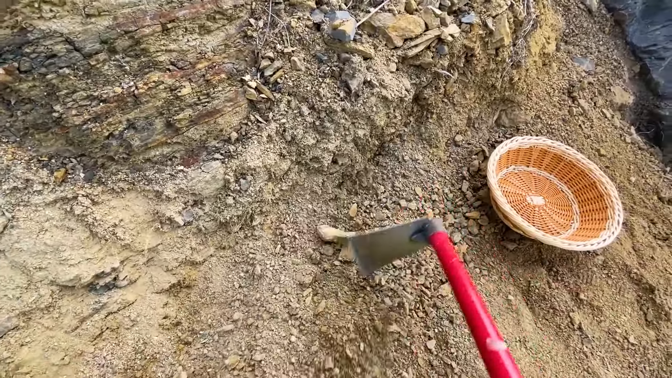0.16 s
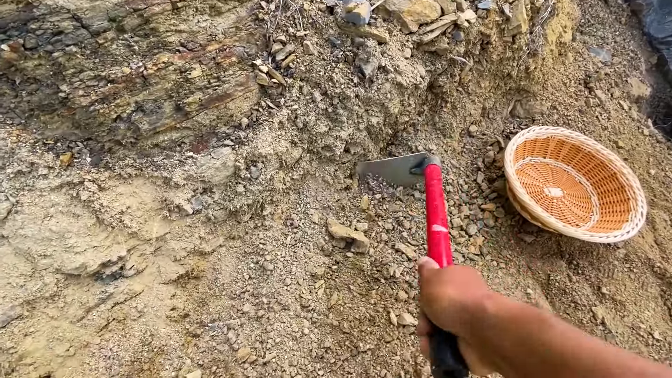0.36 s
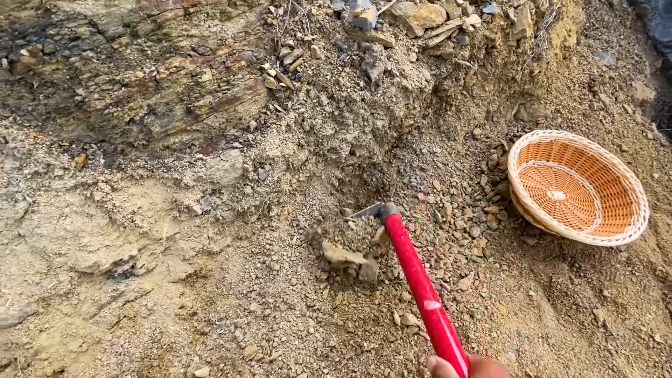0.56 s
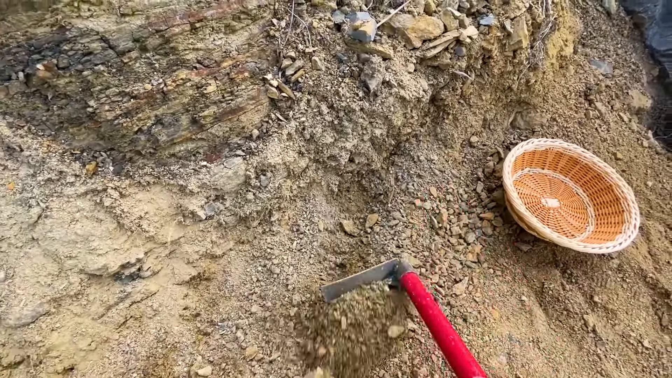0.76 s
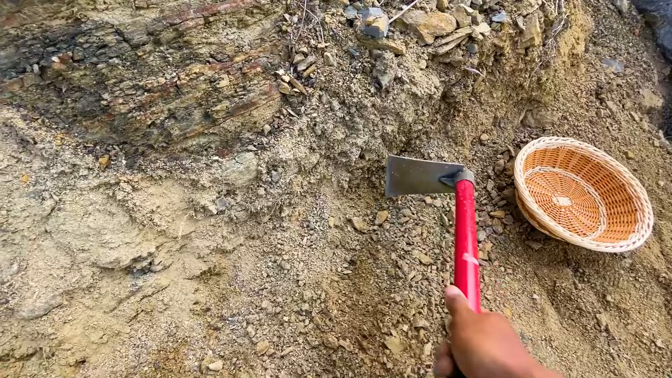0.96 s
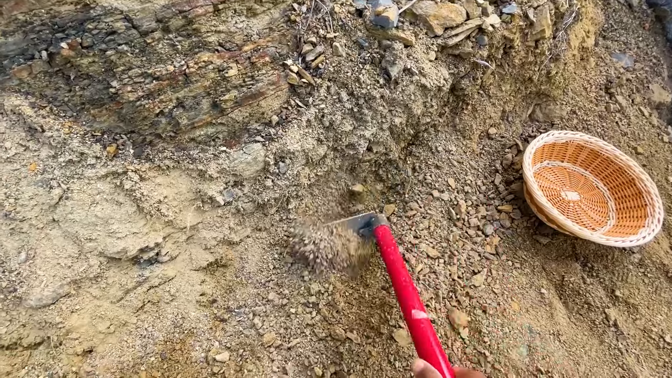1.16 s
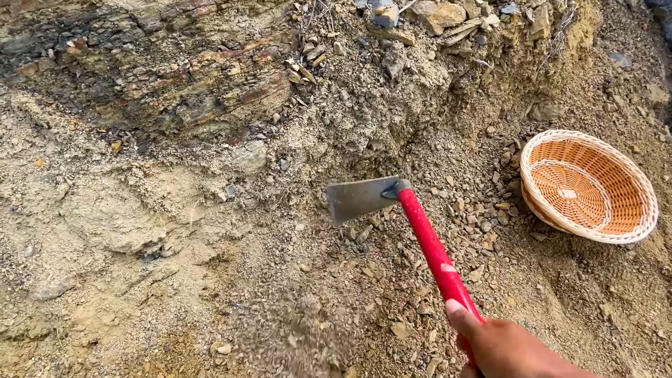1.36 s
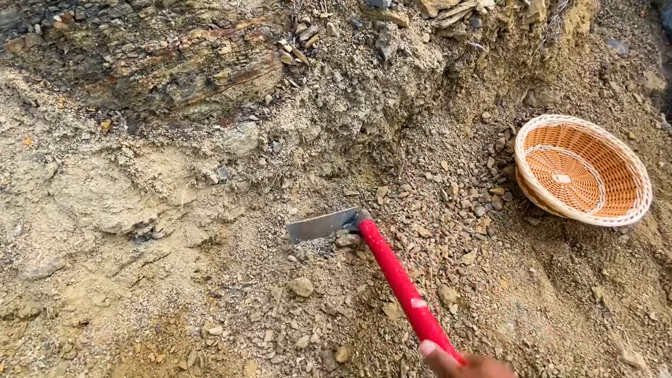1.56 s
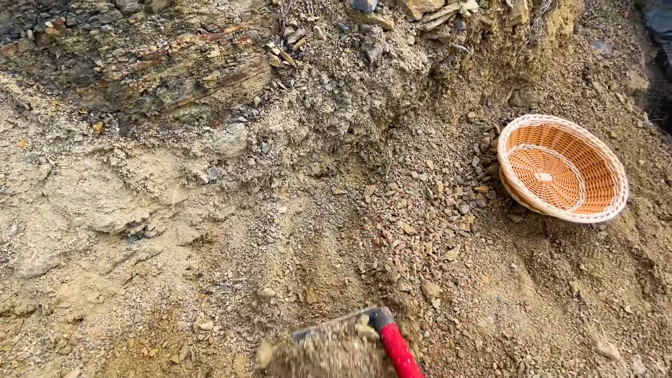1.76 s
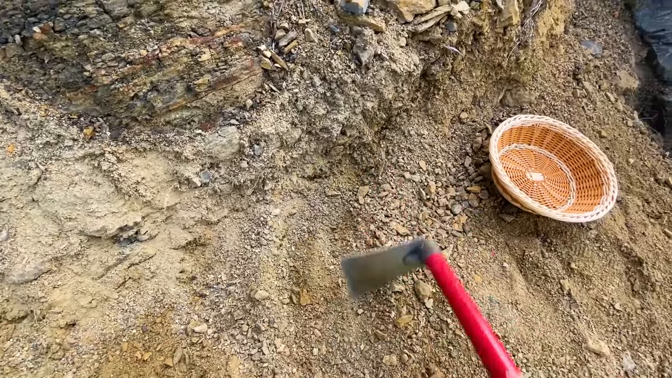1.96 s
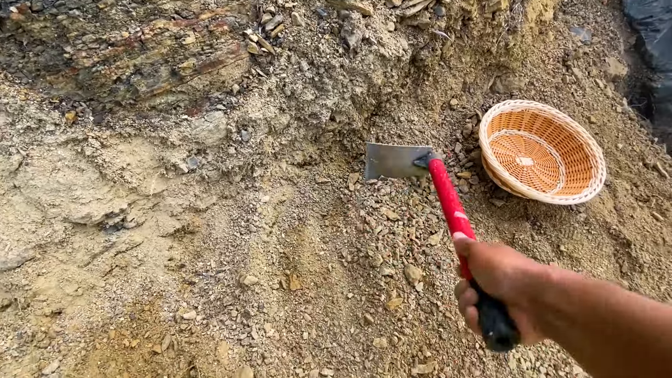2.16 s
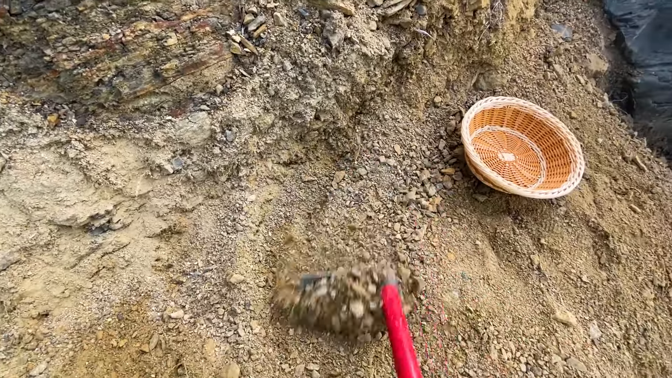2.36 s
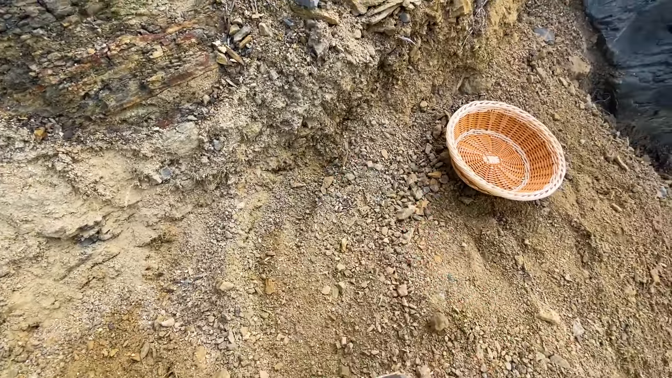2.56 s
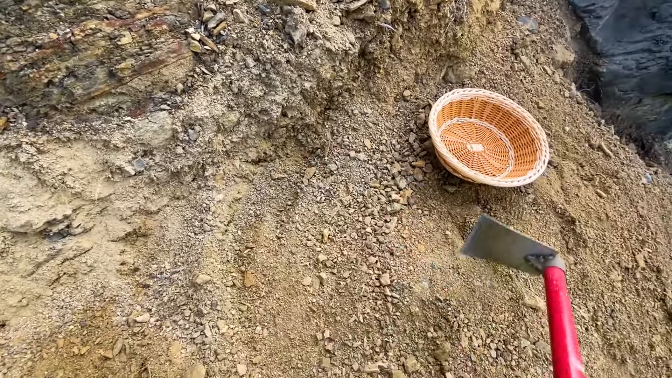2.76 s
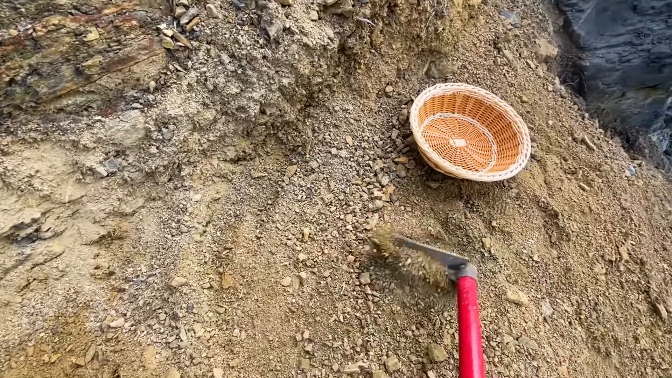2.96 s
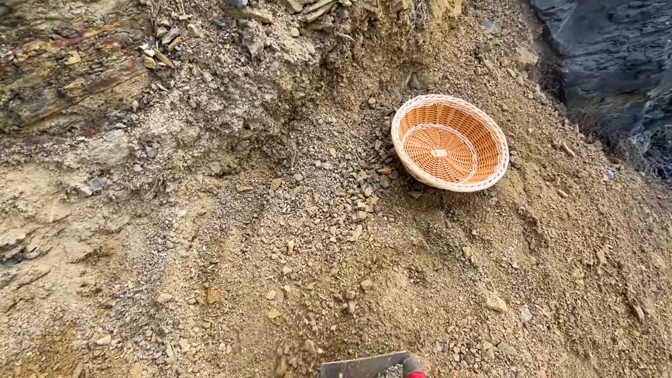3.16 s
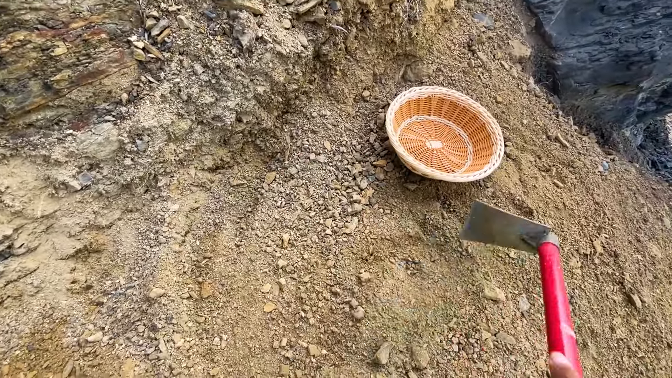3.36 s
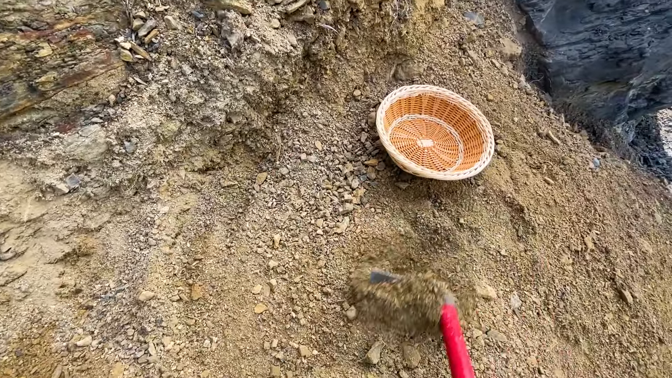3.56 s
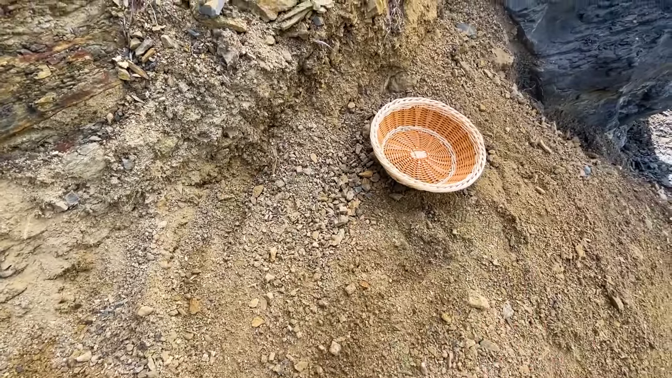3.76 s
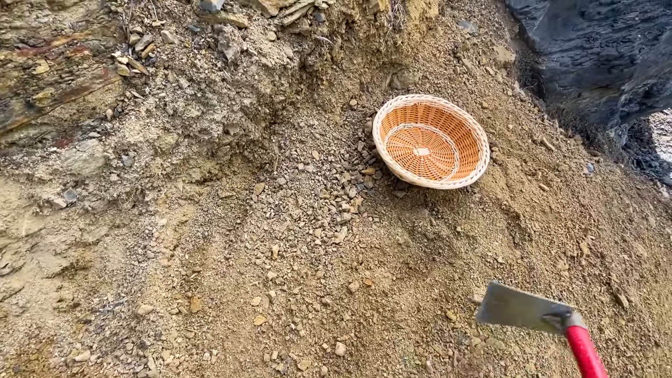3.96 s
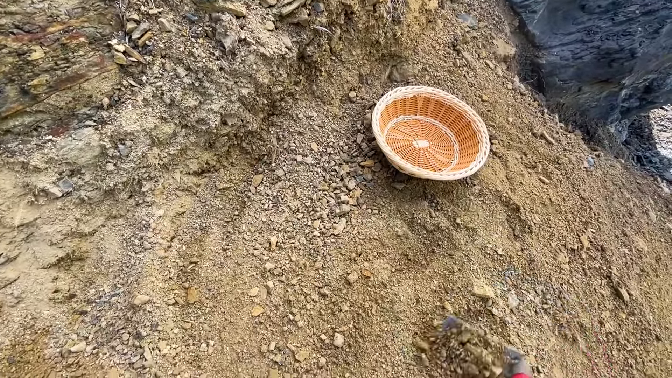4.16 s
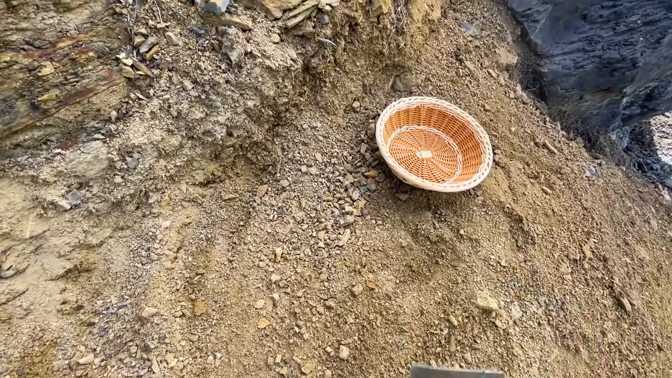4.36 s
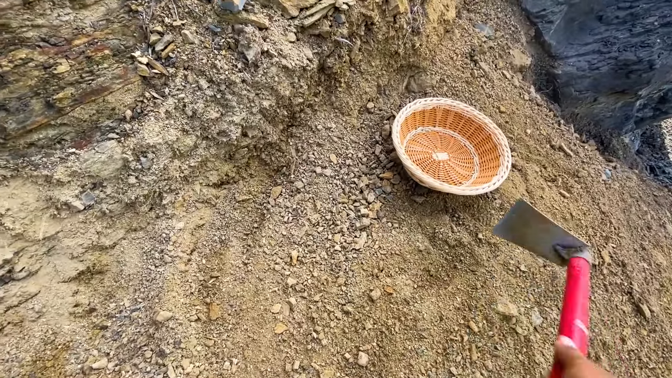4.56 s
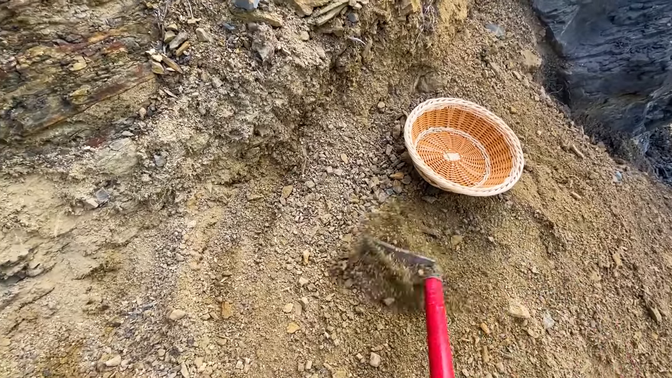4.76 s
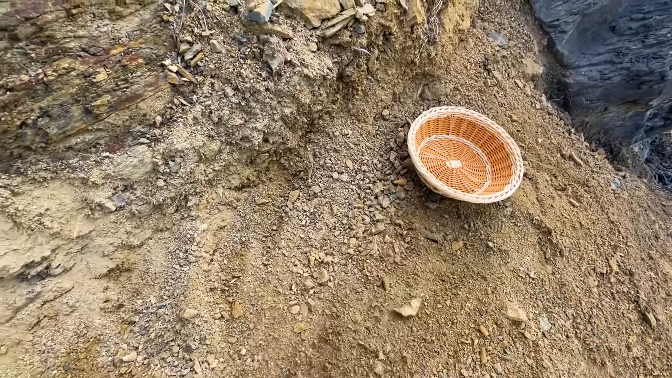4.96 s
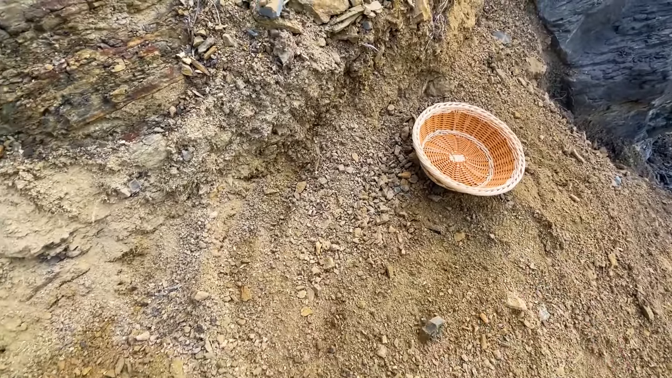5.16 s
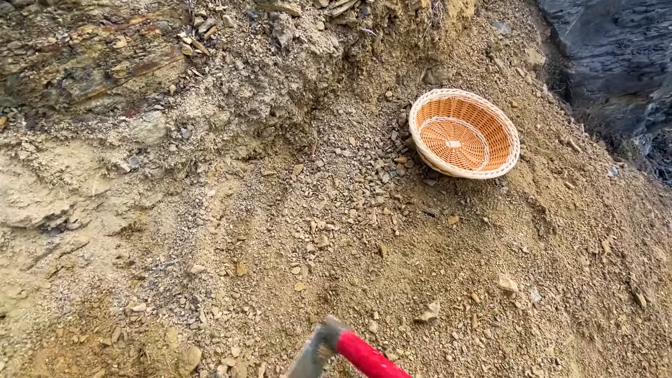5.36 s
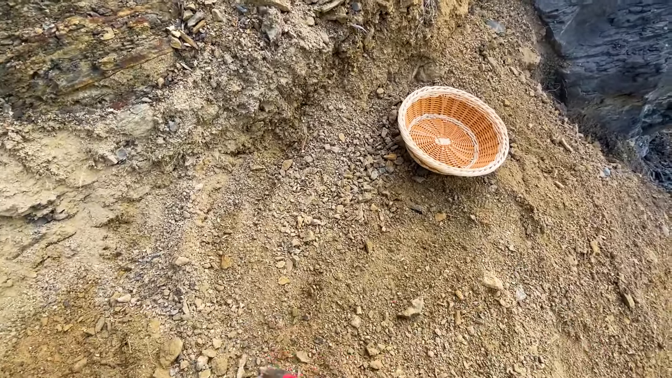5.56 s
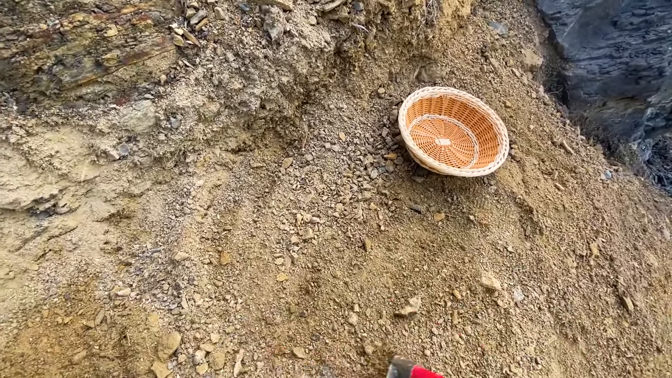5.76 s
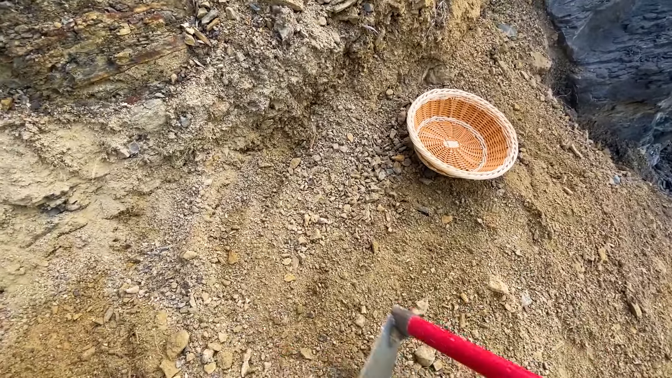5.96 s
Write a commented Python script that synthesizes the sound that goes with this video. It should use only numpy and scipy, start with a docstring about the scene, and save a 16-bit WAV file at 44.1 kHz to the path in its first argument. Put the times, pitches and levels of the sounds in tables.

```python
"""A steel hoe chops into dry gravelly soil and drags it back, about once every 0.6 s, close by and outdoors.
Bites and drags are noise made of tiny grain contacts, shaped by the cutting force; loose soil spills afterwards.
Stones knock on the blade as short noise bursts; the blade sings as resonances and rings freely as decaying sines.
Some swings swish as smooth noise, and a breeze buffets the ports of a closely spaced microphone pair."""
import sys
import numpy as np
from scipy import signal
from scipy.fft import rfft, irfft, next_fast_len
from scipy.io import wavfile
from scipy.ndimage import map_coordinates

SR = 44100
rng = np.random.default_rng(int(sys.argv[2]) if len(sys.argv) > 2 else 0)


def master_out(mix):
    """Clip the mix to full scale and print it as 16-bit PCM to the path in sys.argv[1]."""
    frames = np.transpose(np.atleast_2d(mix))
    ceiling = np.clip(frames, -1, 1)
    pcm = np.round(ceiling * 32767).astype(np.int16)
    wavfile.write(sys.argv[1], SR, pcm)


N = 265041
TIME = np.arange(N) / SR

# modes of the steel blade: [f/Hz, width in soil/Hz, lift in soil/dB, relative free ring/dB, free t60/s]
BLADE_MODES = [(898, 69, 13.5, -33, 0.018), (1938, 42, 10.5, -1, 0.48), (3424, 37, 10.5, -22, 0.032),
               (4810, 88, 14.5, -4, 0.084), (7432, 94, 16, 4, 0.041), (8895, 80, 18, 8, 0.1),
               (9460, 85, 10, 4, 0.074), (11100, 32, 10.5, -20, .03), (11820, 69, 16, -10, 0.042),
               (12650, 100, 10, -20, .03)]
# state of the ground, packed (thuds, damps the steel) or loose (lets it sing): [t/s, thud/dB, ring/dB]
GROUND_STATE = [(0, 0.5, 2), (2.35, -7.5, 1.5), (2.9, -6, 2), (3.5, -11, 1.5), (4.7, -13.5, 3),
                (5.6, -8.5, 4)]
# spectrum of crunching gravel: [f/Hz, relative level per Hz/dB]
GRAVEL_SPECTRUM = [(200, -13.5), (500, -19), (1150, -5.5), (1600, 2.5), (2400, 10.5), (3000, 2),
                   (4200, 2.5), (5700, -8), (6600, 1.5), (8100, -22.5), (10000, -29), (14000, -49)]
# spectrum of a dull thud: [f/Hz, relative level per Hz/dB]
THUD_SPECTRUM = [(100, -35), (350, -14), (750, 10), (1100, -3), (1700, 8), (4000, -22)]


def amp(db):
    """Level to amplitude: 20 dB is a factor of ten."""
    return 10 ** (np.asarray(db) / 20)


def unit(x):
    """Normalisation to an rms of 1."""
    return x / np.sqrt(np.mean(np.abs(x) ** 2) + 1e-20)


def along(points, hz):
    """Linear interpolation of (f, value) points on a logarithmic frequency axis."""
    f, v = np.transpose(points)
    return np.interp(np.log(hz + 1), np.log(f + 1), v)


def gains(rows):
    """Gain curves over time, interpolated in dB, one for each column after t."""
    s, *columns = np.transpose(rows)
    return np.array([amp(np.interp(TIME, s, column)) for column in columns])


def wobble(rate):
    """Slow random modulation: a smooth curve through rate random knots a second."""
    knots = rng.standard_normal(int(N * rate / SR) + 4)
    return map_coordinates(knots, [TIME * rate], mode="nearest")


def filtered(x, response):
    """Linear filtering: the spectrum of x times a complex frequency response."""
    m = 2 * next_fast_len(N // 2 + 8192)  # zero padding leaves room for the filter's tail
    return irfft(rfft(x, m) * response(np.fft.rfftfreq(m, 1 / SR)), m)[..., :N]


def colour(points, hz):
    """Minimum-phase (causal) response of the given spectrum and mean power gain 1, by a folded cepstrum."""
    cepstrum = irfft(np.log(amp(along(points, hz))))
    half = len(cepstrum) // 2
    cepstrum[1:half] *= 2
    cepstrum[half + 1:] = 0
    return unit(np.exp(rfft(cepstrum)))


def coloured(x, spectrum):
    """Spectral shaping of x by a minimum-phase filter."""
    return filtered(x, lambda hz: colour(spectrum, hz))


def grains(rate, spread_db, life, bed):
    """Shot noise: rate tiny contacts a second, of random size and moment, over a bed of finer dust."""
    size_db = spread_db * np.clip(rng.standard_normal(N), -3, 2.2)
    hits = (rng.random(N) < rate / SR) * amp(size_db) ** 2
    power = signal.lfilter([1], [1, -np.exp(-1 / (life * SR))], hits)  # each contact lasts about life seconds
    return unit(np.sqrt(power / power.mean() + abs(bed)) * rng.standard_normal((2, N)))


def surge(s, rise, hold, fall_db_per_s):
    """Transient envelope: opens exponentially from s, then decays at a constant dB rate once hold is over."""
    t = np.maximum(TIME - s, 0)
    return (1 - np.exp(-t / rise)) * amp(-fall_db_per_s * np.maximum(t - hold, 0))


def pull(s, rise, fall):
    """Frictional load of a drag: force builds up, slackens and ends as the blade lifts."""
    swell_db, fade_db = 15.5, 15  # gain up to full pull, loss while letting go
    lift_s = 0.022  # fade at either end, as the blade enters and leaves the soil
    force_db = np.interp(TIME - s, [0, rise, rise + fall], [-swell_db, 0, -fade_db])
    nearest_end = np.minimum(TIME - s, s + rise + fall - TIME)
    return np.clip(nearest_end / lift_s + 1, 0, 1) * amp(force_db)


def pebbles(spread_db, count):
    """Damped oscillation: small stones click at their own pitch and die within a few cycles; rms 1."""
    centre_hz, spread_octaves = 2814, 0.664
    decay_cycles = 5  # cycles to fall to 1/e
    moment, channel = rng.random((2, count, 1))
    pitch, size = np.clip(rng.standard_normal((2, count, 1)), -2, 2)
    k = np.arange(SR // 80)
    cycles = centre_hz * 2 ** (spread_octaves * pitch) * k / SR
    clicks = amp(spread_db * size) * np.sin(2 * np.pi * cycles) * np.exp(-cycles / decay_cycles)
    index = ((moment * N).astype(int) + k).ravel()
    shares = np.cos(2 * np.pi * channel), np.sin(2 * np.pi * channel)
    return unit(np.array([np.bincount(index, (clicks * share).ravel(), N)[:N] for share in shares]))


def drags():
    """Stick-slip friction: each slip of the blade lets go a clump of dry grains; pebbles click among them."""
    # the edge bites into the soil: [t/s, relative gravel crunch/dB, relative fine grit/dB, cutting time/s]
    bites = [(0.0, -40, -28, 0.026), (0.365, -31.5, -29, 0.036), (1.503, -36, -31, 0.061),
             (2.183, -35.5, -31.5, 0.015), (2.872, -45, -30, 0.012), (3.408, -45, -42.5, 0.039),
             (3.472, -41, -38.5, 0.053), (4.023, -65.5, -45, 0.014), (4.133, -64, -39.5, 0.056),
             (4.636, -33, -31, 0.035), (5.556, -36.5, -33, .035)]
    # the blade is pulled: [t/s, time to full pull/s, time to let go/s, relative crunch/dB, relative grit/dB]
    strokes = [(0.05, 0.035, 0.07, -46.5, -38), (0.421, 0.036, .03, -38, -36.5),
               (0.501, 0.16, 0.034, -31, -27), (1.096, 0.036, 0.13, -33, -29.5),
               (1.58, 0.093, 0.073, -38, -37.5), (2.237, 0.045, .2, -32, -26.5),
               (2.909, 0.04, 0.21, -35, -30.5), (3.49, 0.061, 0.15, -34.5, -30),
               (3.79, 0.038, 0.034, -44.5, -41), (4.071, 0.17, 0.059, -38, -32.5),
               (4.67, 0.061, 0.073, -32.5, -28.5), (4.828, 0.012, 0.089, -39.5, -32.5),
               (4.93, 0.024, 0.079, -37.5, -34.5), (5.6, 0.052, 0.14, -39, -37)]
    # spectrum of fine grit: [f/Hz, relative level per Hz/dB]
    grit_spectrum = [(3000, -26), (7500, -11.5), (8800, -8), (10100, 5.5), (11000, -2.5), (12000, -15),
                     (12800, -16), (13500, -18), (16000, -54)]
    bite_rise_s, bite_fall_db_per_s = 0.002, 447

    crunch, grit = np.zeros((2, N))
    for s, crunch_db, grit_db, hold in bites:
        force = surge(s, bite_rise_s, hold, bite_fall_db_per_s)
        crunch += force * amp(crunch_db)
        grit += force * amp(grit_db)
    for s, rise, fall, crunch_db, grit_db in strokes:
        force = pull(s, rise, fall)
        crunch += force * amp(crunch_db)
        grit += force * amp(grit_db)

    packed = gains(GROUND_STATE)[0]
    slips = wobble(70)  # coarse and fine grains are let go together
    coarse = crunch * unit(amp(2.3 * slips) * grains(rate=600, spread_db=7, life=.0007, bed=.25))
    fine = grit * unit(amp(2.8 * slips) * grains(rate=600, spread_db=7, life=.0005, bed=.2))
    gravel = coloured(coarse * amp(-3.5), GRAVEL_SPECTRUM)
    thud = coloured(coarse * packed * amp(-5), THUD_SPECTRUM)
    hiss = coloured(fine * amp(-5), grit_spectrum)
    clicks = crunch * amp(-11) * pebbles(spread_db=2.5, count=900)
    return gravel + thud + hiss + clicks


def blade_modes(hz, modes):
    """Modal resonance: the lift that the blade, damped by soil, gives near each of its modes."""
    response = 0
    for centre, width, lift_db, _, _ in modes:
        damping = 1j * hz * width
        response = response + (amp(lift_db) - 1) * damping / (centre ** 2 - hz ** 2 + damping)
    return response


def singing(force):
    """Forced vibration: scraping drives three sets of blade modes, which come and go independently."""
    wander_db = 2  # the point of contact moves along the blade and favours now one set, now another
    out = 0
    for modes in (BLADE_MODES[0::3], BLADE_MODES[1::3], BLADE_MODES[2::3]):
        drive = force * unit(amp(wander_db * wobble(28)))
        out = out + filtered(drive, lambda hz: blade_modes(hz, modes))
    return out


def eddies(spectrum, size):
    """Turbulence: noise whose spectrum shifts upward as the eddies get smaller."""
    return filtered(rng.standard_normal((2, N)), lambda hz: colour(spectrum, hz * size))


def wind():
    """Turbulent pressure: eddies push on the ports in lumps, harder on the left, partly in opposite phase."""
    # breeze: [t/s, relative rumble/dB, relative buffeting/dB]
    breeze = [(0.0, -37.5, -34), (0.17, -36, -39.5), (0.57, -39, -36), (0.95, -37.5, -47.5),
              (1.04, -53, -59), (1.39, -31.5, -33.5), (1.5, -46, -67), (1.57, -38.5, -39),
              (2.31, -38.5, -47.5), (2.46, -43, -58.5), (3.11, -40.5, -49.5), (3.2, -46, -64),
              (3.53, -41.5, -50.5), (4.03, -44, -55.5), (4.63, -39, -45), (4.79, -53, -65),
              (5.1, -42.5, -51.5), (6.01, -38.5, -44)]
    # single gusts slap the ports: [t/s, relative level/dB, half length to 1/e/s]
    gusts = [(0.203, -22.5, 0.02), (0.81, -26, 0.013), (1.308, -24, 0.0025), (1.369, -34, 0.012),
             (3.628, -44, 0.015), (3.798, -52, 0.01), (4.445, -36.5, 0.012), (4.613, -32, 0.011),
             (5.828, -34.5, 0.013), (6.0, -28, 0.0066)]
    # spectrum of the rumble: [f/Hz, relative level per Hz/dB]
    rumble_spectrum = [(15, -57), (30, -18), (50, -6), (65, 0), (100, -3.5), (150, -7), (250, -21),
                       (600, -75)]
    # spectrum of the buffeting: [f/Hz, relative level per Hz/dB]
    buffet_spectrum = [(80, -16.5), (180, 0), (280, 0.5), (420, -7.5), (650, -20), (1100, -27), (2500, -57),
                       (6000, -62)]

    rumble, buffet = gains(breeze)
    puffs = sum(amp(db) * np.exp(-((TIME - s) / length) ** 2) for s, db, length in gusts)
    low = eddies(rumble_spectrum, size=1) * rumble * amp(6.5)
    lumps = unit(amp(4.48 * wobble(35)))
    high = eddies(buffet_spectrum, size=1) * buffet * lumps * amp(6.5)
    slaps = eddies(buffet_spectrum, size=.5) * puffs * amp(-4.5)  # small fast eddies reach an octave higher
    apart, alike = (low + high + slaps) * amp([[0], [-5]])
    return np.array([amp(1.5) * (alike + apart), amp(-5.5) * (alike - apart)])


def trickle():
    """Granular flow: loose crumbs roll down the slope after the strokes, with single pebbles ticking."""
    # loosened soil lands and settles: [t/s, relative level/dB]
    spills = [(0.08, -55), (0.68, -45), (1.29, -52.5), (1.73, -46), (1.863, -86), (2.48, -47.5),
              (2.566, -56.5), (2.74, -64), (3.14, -52), (3.67, -51.5), (3.85, -78), (4.288, -50),
              (5.0, -45), (5.22, -52), (5.42, -58), (5.77, -48.5)]
    # spectrum of rolling soil: [f/Hz, relative level per Hz/dB]
    soil_spectrum = [(300, -23.5), (900, -2), (2300, -3.5), (5700, -5), (7200, -3.5), (8300, -3.5),
                     (10000, 5.5), (11500, 2.5), (12700, -31), (13600, -17), (16000, -61)]
    rise_s, hold_s, fall_db_per_s = 0.012, 0.033, 53
    sliding = amp(-65)  # the slope never stops creeping
    for s, db in spills:
        sliding = sliding + amp(db) * surge(s, rise_s, hold_s, fall_db_per_s)
    crumbs = grains(rate=1500, spread_db=5.5, life=.0004, bed=.9)
    ticks = amp(-7) * grains(rate=90, spread_db=5, life=.0007, bed=0)
    flow = sliding * amp(-2) * (crumbs + ticks)
    # the blade resonates faintly with the flow
    return filtered(flow, lambda hz: colour(soil_spectrum, hz) * (1 + 0.24 * blade_modes(hz, BLADE_MODES)))


def stones():
    """Impact with brief grinding: a crack, the stone's own resonant clack, a dull thud and a bright edge."""
    # stones on the blade: [t/s, relative peak/dB, relative thud/dB, relative edge/dB, t60/s, stone f/Hz]
    knocks = [(0.0329, -12.5, -3.5, -7.5, 0.027, 1420), (0.462, -19.5, -15, 5, 0.016, 5160),
              (0.507, -23, -5, 5.5, 0.051, 2700), (0.607, -16.5, -9, -26, 0.011, 1920),
              (0.62, -2.5, -7.5, -28, 0.015, 1520), (0.6246, -11.5, 2, 4, 0.029, 1690),
              (0.671, -6.5, -12.5, -0.5, 0.049, 2240), (1.049, -8, -8, 1, 0.039, 4800),
              (1.1115, -20.5, 0, -2, 0.022, 1600), (1.128, -19, -18, -13, 0.016, 4550),
              (1.508, -8, -12, -21, 0.013, 2100), (1.6159, -12, -10.5, -10, 0.012, 2460),
              (1.6517, -11.5, -12.5, -7, 0.016, 1940), (1.6596, -9.5, -29, 6, 0.0067, 1860),
              (1.727, -22, 4.5, -25, 0.016, 2470), (2.285, -23.5, 0.5, -14, 0.096, 860),
              (2.3222, -17, -2.5, -12, 0.032, 895), (2.439, -22, -28, -28, 0.053, 4640),
              (2.4811, -24.5, -36, -1, 0.04, 2490), (2.9725, -19.5, -14.5, -3.5, 0.033, 2700),
              (3.0485, 0, -20, -40, 0.012, 2300), (3.062, -13, -9, -12, 0.06, 2350),
              (3.1712, -12.5, -20, -20, 0.013, 2140), (3.1974, -26.5, -7, -2, 0.029, 2110),
              (4.7257, -2.5, -18, 3.5, 0.023, 4100), (4.7754, -19.5, -16, -2, 0.027, 2600),
              (4.835, -16.5, -46, -2, 0.012, 2040), (4.9514, -27.5, -0.5, 20, 0.021, 4650),
              (5.1942, -32, -15, -5, 0.081, 2560), (5.5586, -15.5, -5, 5.5, 0.0093, 4950),
              (5.675, -20.5, -12.5, -8, 0.024, 2440), (5.722, -19, -13, -17, 0.018, 1960)]
    # spectrum of the bright edge: [f/Hz, relative level per Hz/dB]
    edge_spectrum = [(3000, -80), (7500, -2.5), (8700, 0.5), (9400, 9), (10200, 7), (11000, -3),
                     (12000, -8.5), (13000, -10), (16000, -48)]
    rise_share = .07  # rise time over t60: a stone that grinds longer also builds up more slowly

    crack, clack, thud, edge = np.zeros((4, 2, N + SR))
    t = np.arange(SR // 6) / SR
    for s, db, thud_db, edge_db, t60, pitch_hz in knocks:
        fade = amp(db - 60 * t / max(t60, .004)) * (1 - np.exp(-t / (rise_share * t60)))
        burst, knock = fade * rng.standard_normal((2, 2, len(t)))
        body = signal.iirpeak(min(pitch_hz, SR / 4), 3, SR)
        start = round(s * SR)
        span = slice(start, start + len(t))
        crack[:, span] += amp(-8.5) * burst
        clack[:, span] += amp(5.5) * signal.lfilter(*body, signal.lfilter(*body, knock))
        thud[:, span] += amp(thud_db - 2.5) * burst
        edge[:, span] += amp(edge_db - 7) * burst
    out = clack[:, :N] + coloured(crack[:, :N], GRAVEL_SPECTRUM)
    return out + coloured(thud[:, :N], THUD_SPECTRUM) + coloured(edge[:, :N], edge_spectrum)


def swishes():
    """Aerodynamic noise: a soft, smooth swish swells and fades with a few swings of the arm."""
    # some swings of the arm: [t of greatest speed/s, swish level/dB]
    swings = [(0.17, -46), (1.02, -47.5), (1.32, -49), (2.19, -46.5)]
    # spectrum of the swish: [f/Hz, relative level per Hz/dB]
    swish_spectrum = [(400, -13), (900, 2), (1500, 1.5), (2500, -18), (3700, -3), (5000, -12), (7100, -1.5),
                      (8500, -12), (12000, -43), (15000, -47)]
    swing_s = 0.074  # half length of a swish, to 1/e
    level = sum(amp(db) * np.exp(-((TIME - s) / swing_s) ** 2) for s, db in swings)
    return coloured(level * rng.standard_normal((2, N)), swish_spectrum)


def ringing():
    """Free vibration: out of the soil each mode decays at its own rate until the blade touches ground again."""
    # the blade springs free: [t/s, relative low modes/dB, relative high modes/dB, rise/s, time until damped/s]
    releases = [(3.10, -51, -52, .01, .15), (3.828, -43.5, -50, .01, .33), (4.64, -35, -42, .015, .06),
                (4.835, -33, -44, .025, .07), (5.89, -49, -32, .015, .3)]
    out, t = np.zeros((2, N + SR)), np.arange(SR // 2) / SR
    for s, low_db, high_db, rise, free in releases:
        contact = (1 - np.exp(-t / rise)) * np.exp(-np.maximum(t - free, 0) / 0.0024)
        start = round(s * SR)
        for hz, _, _, ring_db, t60 in BLADE_MODES:
            db = ring_db + (low_db if hz < 3000 else high_db) + rng.normal(0, 1)
            # one signal of the pair only: ports() spreads it over left and right
            out[0, start:start + len(t)] += contact * amp(db - 60 * t / t60) * np.sin(2 * np.pi * hz * t)
    return out[:, :N]


def ports(pair):
    """Interchannel coherence: two unrelated signals become left and right of a closely spaced pair."""
    # likeness of left and right: [f/Hz, correlation]
    likeness = [(300, 0.079), (900, 0.51), (2400, 0.47), (3400, 0.092), (6000, 0.039), (8000, 0.068),
                (9300, 1), (12000, 1), (15000, 0.63)]
    # level of left over right: [f/Hz, L-R/dB]
    balance = [(300, -9), (900, 1), (2000, 0.5), (3400, 5.5), (5000, 5.5), (6800, 13.5), (8600, 1),
               (10000, 0)]
    # phase by which left leads: [f/Hz, phase/rad]
    phase_lead = [(800, 0), (2500, .4), (7500, .3), (8900, -.45), (9500, -2.25), (10200, -3.14),
                  (11000, -4.3), (11800, -6.15), (12400, -6.45), (13500, -9.2), (16000, -12.6)]

    def mix(hz):
        angle = np.arccos(np.clip(along(likeness, hz), -1, 1)) / 2
        return np.array([np.cos(angle), np.sin(angle)])

    def split(hz):
        half = np.array([[.5], [-.5]])  # each channel takes half of the difference
        return amp(half * along(balance, hz)) * np.exp(1j * half * along(phase_lead, hz))

    mid, side = filtered(pair, mix)
    return filtered(np.array([mid + side, mid - side]), split)


def scene():
    """Superposition: the hoe at work reaches the pair through the air, the wind acts on the ports directly."""
    scrape, knocks = drags(), stones()
    looseness = gains(GROUND_STATE)[1]
    # a stone pressed hard against the blade mutes its ring
    steel = singing((scrape + amp(-4) * knocks) * looseness) + ringing()
    return ports(scrape + knocks + steel + trickle() + swishes()) + wind()


def record(dry):
    """Clipping and band limiting: peaks stop at full scale and nothing above the top frequency is kept."""
    top_hz = 15830
    return filtered(np.clip(dry, -1, 1), lambda hz: hz < top_hz)


dry = scene()
out = record(dry)
master_out(out)
```